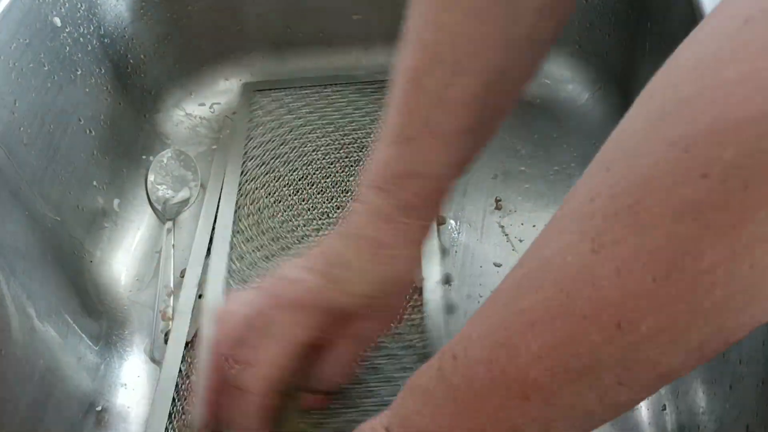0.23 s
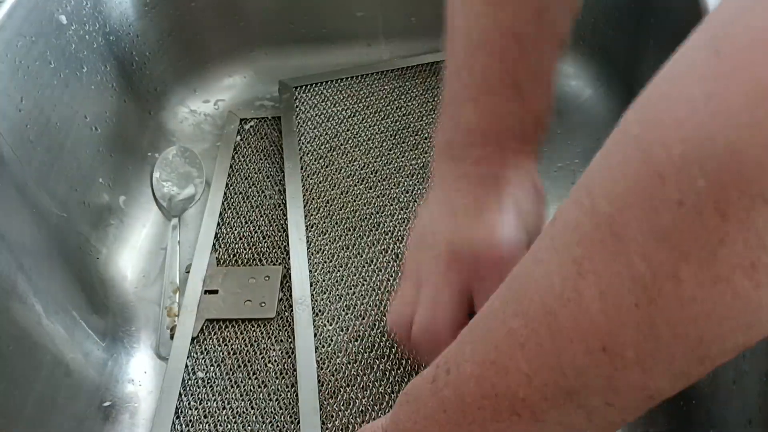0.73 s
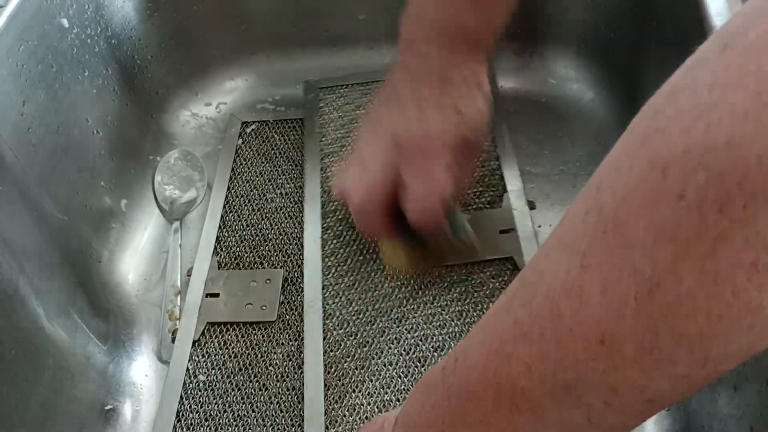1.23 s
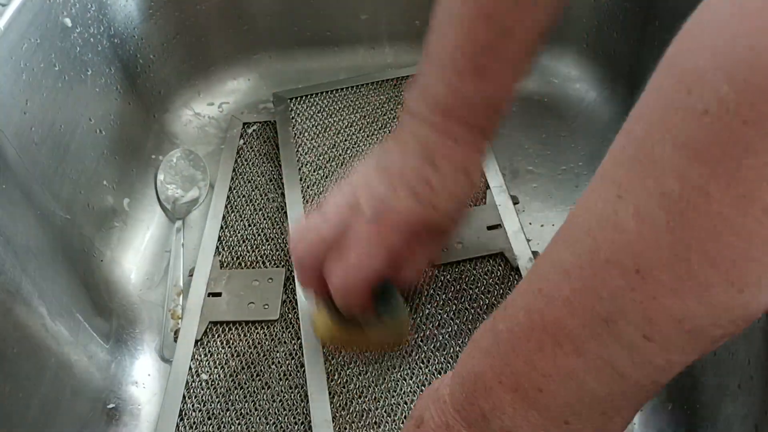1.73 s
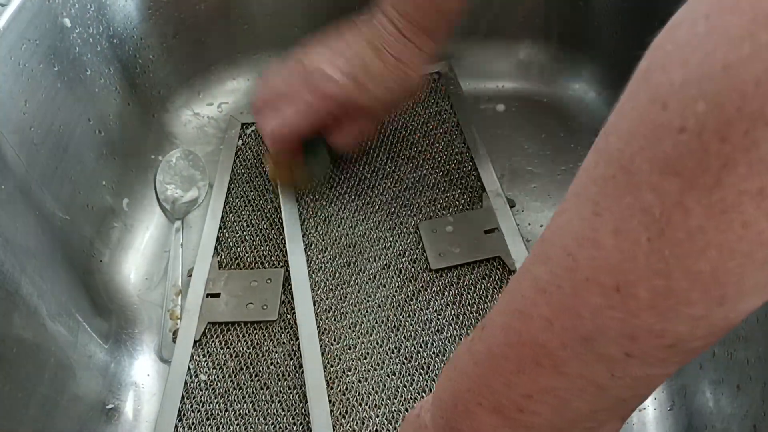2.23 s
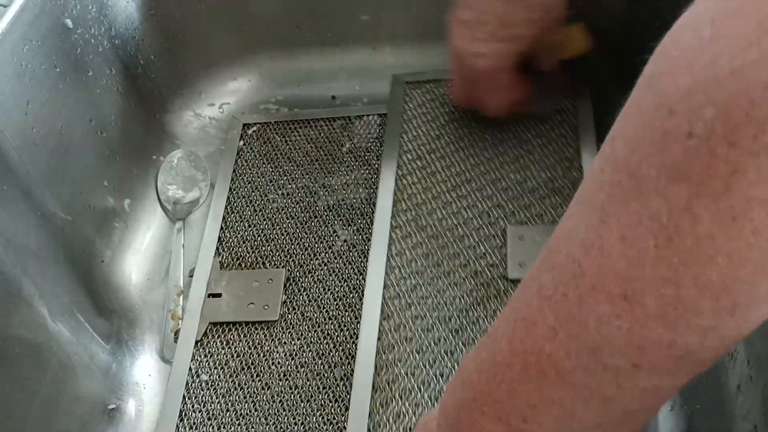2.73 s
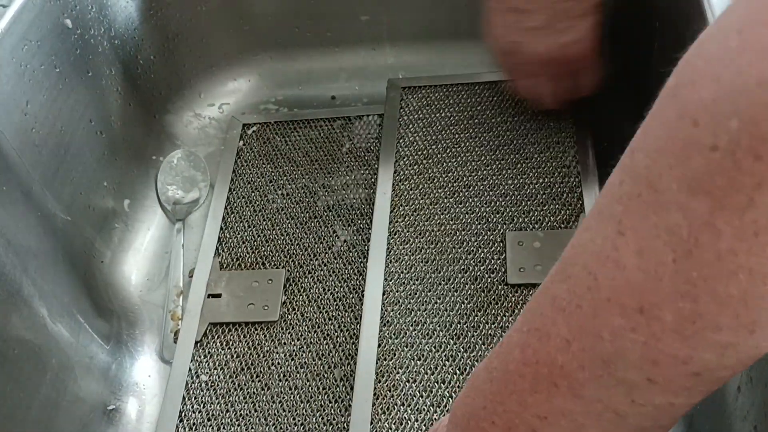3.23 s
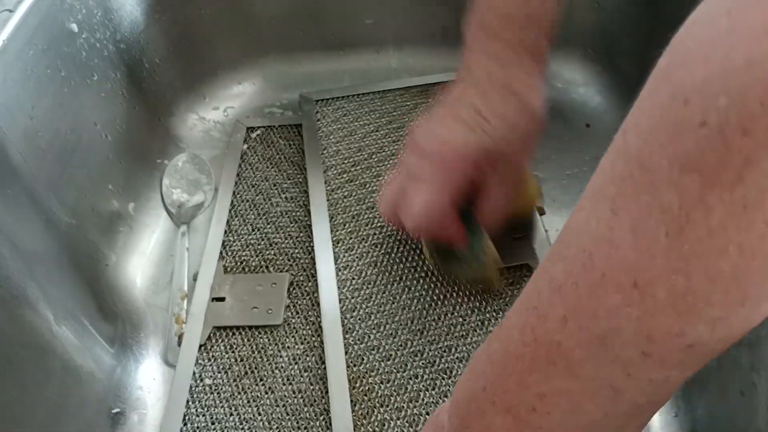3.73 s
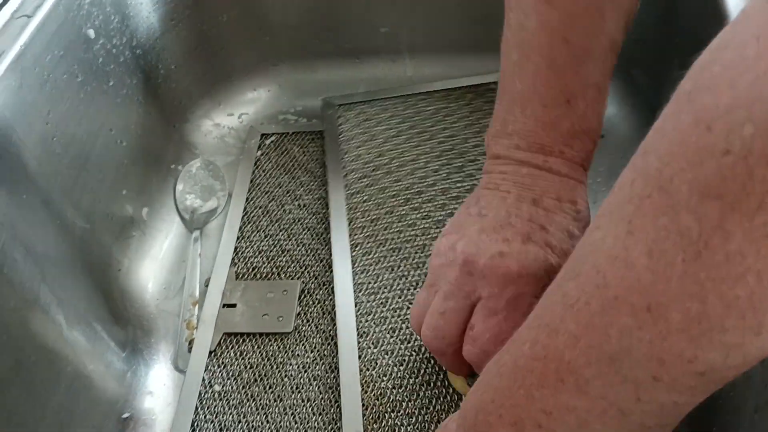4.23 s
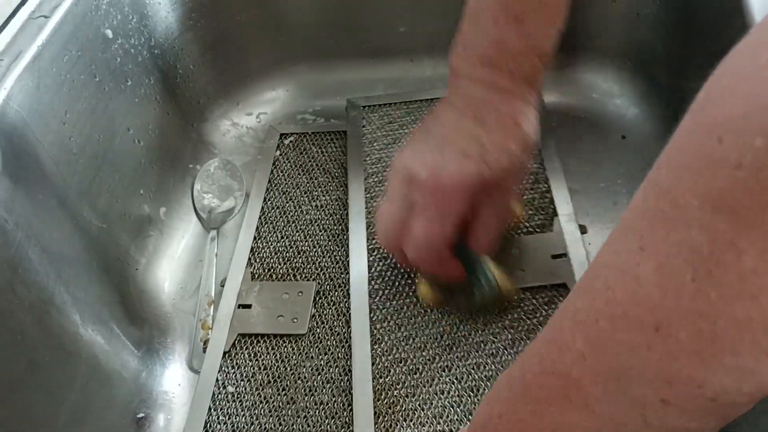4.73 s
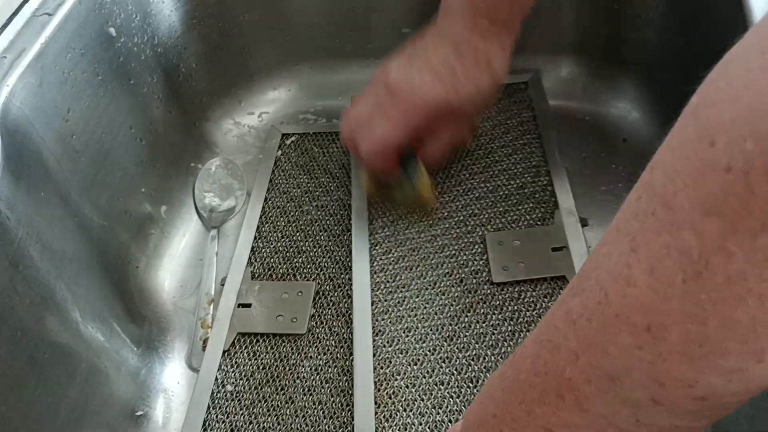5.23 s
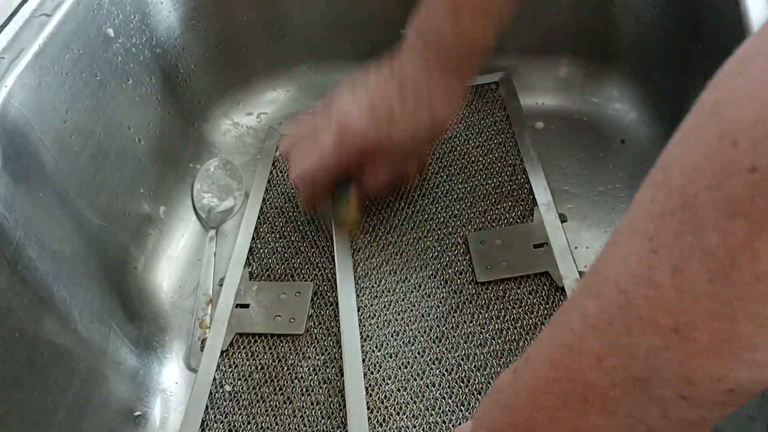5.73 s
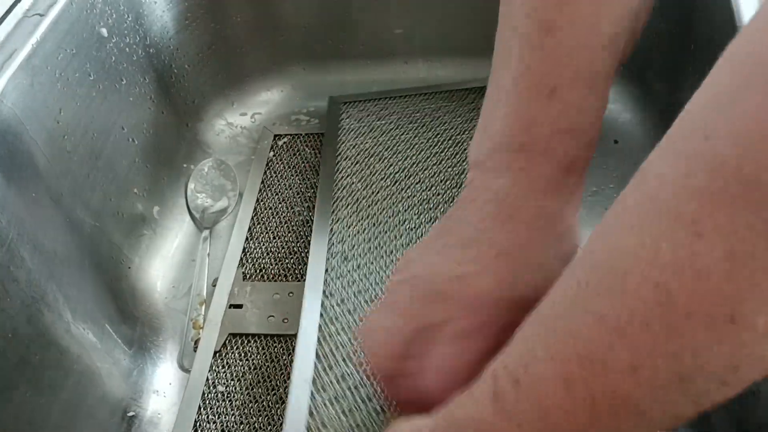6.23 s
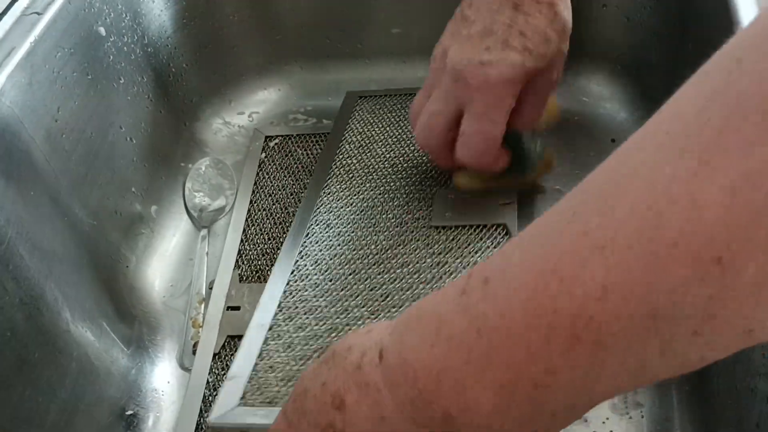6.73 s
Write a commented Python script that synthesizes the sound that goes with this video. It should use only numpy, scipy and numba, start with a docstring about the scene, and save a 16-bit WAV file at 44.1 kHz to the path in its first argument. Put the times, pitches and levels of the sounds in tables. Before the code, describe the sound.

In a quiet kitchen, a wet scouring sponge scrubs a loose metal mesh filter in a steel sink, close and slightly left in stereo. It opens mid-stroke with clacks and a hollow basin ring, then a hard knock, low boom and strong rasp near 0.45 s. Another knock and juddering scrape come at 1.0, a loud coarse stroke at 1.2, and softer rubbing until clanks at 2.0 and 2.2. Around 2.5 to 3.6 fast bright scratches come with floor thuds, while a very faint wavering whine swells near 3.2. From 3.9 to 4.6 the strokes are shorter and lighter, with small ringing judders. Knocks cluster at 4.7 to 5.0; tiny squeaks chirp at 5.35. Quieter scrubbing follows, with a light knock at 6.1, a strong clank and judder at 6.5, a thin high squeak at 6.6, and rasping strokes through the end at about 7.

```python
"""In a quiet kitchen, a wet scouring sponge scrubs a metal mesh filter lying in a steel sink, heard close above.
Quick, uneven strokes shape dense plucks into a rasp, a fine scratch and a duller mesh body.
The loose filter knocks (bursts ringing modes) and judders (rough slips ringing its frame); the sponge squeaks.
The sink floor booms in hums and thuds of shaped noise, over faint room air and a wavering whine."""
import sys
import numpy as np
from scipy import signal
from scipy.fft import rfft, irfft
from scipy.io import wavfile
from scipy.ndimage import uniform_filter1d
from numba import njit

SR = 44100
rng = np.random.default_rng(int(sys.argv[2]) if len(sys.argv) > 2 else 0)


def wrap_up_sound(samples):
    """Save the sound to the file named by the first command line argument, as 16-bit audio."""
    columns = np.atleast_2d(samples).T
    # keep every value between -1 and 1, then stretch to whole-number steps
    tamed = np.clip(columns, -1, 1)
    steps = np.round(tamed * 32767).astype(np.int16)
    wavfile.write(sys.argv[1], SR, steps)


N = 308700
TIME = np.arange(N) / SR

# All levels in the tables are relative: the mix gains in the functions come on top.
# Room air spectrum. Each row: frequency in Hz, density in dB per Hz.
KITCHEN_SPECTRUM = [(30, -17), (62, -7), (100, 8.5), (250, -19), (1500, -16), (9000, -33.5)]
# Strokes of the sponge. Each row: time of fastest motion in seconds, spread of the bell in seconds,
# rasp level in dB, fine scratch in dB relative to the rasp, mesh body in dB relative to the rasp.
STROKES = [(-0.01, 0.023, -42, 2, 20.5), (0.077, 0.071, -63.5, -22, 27.5),
           (0.402, 0.035, -44.5, 13.5, -6.5), (0.472, 0.056, -33, -4, 6.5),
           (0.618, 0.027, -58.5, -16, 18.5), (0.796, 0.04, -53.5, 1.5, -4.5), (1.015, 0.02, -39, -4, -6.5),
           (1.175, 0.029, -31.5, 5, -7), (1.34, 0.047, -49.5, -7, -17), (1.414, 0.028, -37, -2.5, -4),
           (1.65, 0.092, -52.5, -8.5, 5.5), (2.159, 0.034, -42, 1, -2), (2.405, 0.029, -51.5, -6.5, -26),
           (2.555, 0.046, -35.5, 13.5, -13.5), (2.633, 0.037, -40, 0.5, 5.5), (2.842, 0.025, -47, -7, 3),
           (3.064, 0.027, -41.5, 6.5, -2.5), (3.275, 0.02, -49, -2, 9.5), (3.4, 0.057, -62.5, 23.5, -11),
           (3.5, 0.026, -40, 9, -5), (3.563, 0.04, -33, 11, 4), (3.646, 0.039, -46, -34, 2),
           (3.963, 0.015, -40, -3, -13), (4.058, 0.018, -50, -7, -0.5), (4.362, 0.0083, -46.5, -2, -10),
           (4.468, 0.022, -53.5, -7, -2), (4.704, 0.035, -55, 5.5, 3.5), (4.912, 0.044, -43, -19, -2.5),
           (5.026, 0.046, -49.5, -2, 11.5), (5.35, 0.08, -58.5, -5.5, 1), (5.548, 0.023, -42, -3.5, -1),
           (5.688, 0.031, -58.5, -17, 0), (5.956, .042, -55, -2, 0), (6.168, 0.019, -52.5, -4, 6),
           (6.266, 0.0071, -51, -8, -6), (6.4, 0.082, -51.5, -9, -3.5), (6.555, 0.035, -52, -3, 14.5),
           (6.678, 0.037, -46, -2, 2.5), (6.794, 0.027, -41, -4, 4.5), (6.99, 0.019, -37.5, 0, -10)]
# Sponge spectra: rasp, fine scratch, mesh body. Each row: frequency in Hz, density in dB per Hz.
RASP_SPECTRUM = [(300, -59.5), (950, -6.5), (1500, 19), (2200, 15.5), (3200, 14), (6400, 11), (9000, -24.5)]
SCRATCH_SPECTRUM = [(2000, 6), (6800, 18.5), (10000, 8), (13500, -4), (15300, 9.5)]
BODY_SPECTRUM = [(130, -30), (550, -3), (1250, -5), (3000, -62.5)]
# Modes of the filter frame. Each row: frequency in Hz, level in dB.
FRAME_MODES = [(1189, -2.5), (1277, 6), (1440, 9.5), (1488, 4), (2030, 3)]
# Knocks of the filter on the sink. Each row: start in seconds, strength in dB, hard tick in dB relative
# to the strength, basin ring likewise, frequency the struck spot favours in Hz, floor boom in dB.
KNOCKS = [(.002, -8, 0, 4.5, 480, -34.5), (.077, -8.5, 1, 8.5, 395, -31), (.363, -18, 8.5, 9.5, 783, -31.5),
          (.452, 2, -5, -6, 395, -33), (1.02, -3.5, -18, -1, 330, -46.5), (1.571, -29, -15, 12, 348, -52),
          (1.969, -22.5, -7.5, -27, 306, -53), (2.032, -3.5, -10.5, -5.5, 930, -39.5),
          (2.174, -8.5, 2, -3.5, 850, -31.5), (2.523, -6, 1.5, -33, 400, -50),
          (3.349, -14, 1, -12, 700, -48), (4.737, -3.5, -2, -1.5, 875, -38.5),
          (4.892, -5, -3.5, -19, 800, -41), (4.988, -7.5, -8, -7.5, 900, -53),
          (5.345, -32, 3, -1, 600, -84), (6.114, -15, -6, -13, 300, -51.5), (6.482, 2, -12, -12, 950, -50)]
# Knock spectra: the clack (also heard in the judders) and the hard tick.
# Each row: frequency in Hz, density in dB per Hz.
CLACK_SPECTRUM = [(60, -6), (160, 4), (900, 4), (1450, 4.5), (4000, 2), (12000, -38)]
TICK_SPECTRUM = [(1000, -15.5), (4500, 0.5), (9500, -13.5), (13500, -31.5), (15500, -18.5)]
# Modes of the steel basin. Each row: frequency in Hz, level in dB.
BASIN_MODES = [(226, 0.5), (306, -1), (366, -2.5), (446, -3), (570, -3.5), (646, -5), (790, 0), (915, -2.5)]
# Pushes of the hand on the sink floor. Each row: time of the peak in seconds, level in dB.
PUSHES = [(.833, -54), (1.602, -40), (1.699, -43), (2.504, -32.5), (2.6, -44.5), (3.127, -60), (3.321, -47),
          (3.519, -35.5), (3.654, -40.5), (4.009, -50), (4.461, -55.5), (5.537, -46.5), (6.665, -44),
          (6.772, -44.5), (6.983, -39)]
# Modes of the sink floor. Each row: frequency in Hz, level in dB.
FLOOR_MODES = [(87, -1.5), (103, 4), (124, 0.5), (180, -12)]
# Squeaks. Each row: middle in seconds, spread of the bell in seconds, pitch in Hz, level in dB.
SQUEAKS = [(0.228, 0.0065, 4450, -51.5), (5.343, 0.0062, 2140, -43.5), (5.362, 0.0067, 2900, -49.5),
           (6.627, 0.0046, 6100, -47.5)]
# Judders of the frame. Each row: middle in seconds, spread of the bell in seconds, level in dB.
JUDDERS = [(0.473, 0.0078, -23.5), (1.017, 0.023, -38.5), (1.15, 0.062, -40.5), (2.04, 0.0089, -42),
           (2.553, 0.017, -34), (3.851, 0.009, -44), (3.966, 0.024, -43.5), (4.372, 0.0084, -41.5),
           (4.455, 0.016, -47), (4.645, 0.0092, -45.5), (4.914, 0.0099, -33.5), (5.002, 0.013, -35.5),
           (6.124, 0.0081, -34), (6.371, 0.049, -46), (6.505, 0.013, -28)]
# Left over right level. Each row: frequency in Hz, difference in dB.
LEFT_BALANCE = [(300, 3), (1000, 8.5), (1600, 7), (2500, 7.5), (6000, 3)]

# each layer's level follows the stroke curve to this power
RASP_POWER, SCRATCH_POWER, BODY_POWER = 0.87, 2.3, 0.61
# sizzle after a stroke: start relative to the top speed and fall, both before those powers
SIZZLE_DB, SIZZLE_DB_PER_S = -21, 176
CREEP_DB = -72  # between strokes the sponge still creeps over the mesh
LOW_CUT_HZ, TOP_HZ = 23.5, 16000


def undb(db):
    """Decibels to gain."""
    return 10 ** (np.asarray(db) / 20)


def unit(x):
    """Scale to rms 1."""
    return x / np.sqrt(np.mean(x ** 2))


def convolve(x, response):
    """Play a sound through a response."""
    return signal.oaconvolve(x, response)[:N]


def gains(points, size):
    """Spread a spectrum in dB over the bins of a transform, on a log frequency axis."""
    hz, db = np.transpose(points)
    return np.interp(np.log(np.fft.rfftfreq(size, 1 / SR) + 1), np.log(hz), db)


def colour(x, points, size=2048):
    """Give a sound a spectrum with a causal filter of unit energy."""
    # folding the cepstrum forward in time makes the filter minimum phase
    cepstrum = irfft(np.log(undb(gains(points, size))))
    response = irfft(np.exp(rfft(2 * cepstrum[:size // 2], size)))
    return convolve(x, response / np.linalg.norm(response))


def ring(x, modes, t60_s):
    """Drive a set of decaying modes of unit total energy."""
    t = TIME[:SR // 2]
    response = sum((-1) ** k * undb(db) * np.sin(2 * np.pi * hz * t) for k, (hz, db) in enumerate(modes))
    response = response * np.exp(-np.log(1000) * t / t60_s)
    return convolve(x, response / np.linalg.norm(response))


def steady(x, seconds):
    """Even out the slow swells of a sound, keeping its grain."""
    size = int(seconds * SR / 2)
    local_power = uniform_filter1d(uniform_filter1d(x ** 2, size), size)
    return x / np.sqrt(np.abs(local_power) + 1e-12)


@njit
def sweep(x, hz, q):
    """State-variable band-pass with a moving centre."""
    y, band, low = np.empty(len(x)), 0., 0.
    for i in range(len(x)):
        g = np.tan(np.pi * hz[i] / SR)
        v = (band + g * (x[i] - low)) / (1 + g * (g + 1 / q))
        band, low, y[i] = 2 * v - band, low + 2 * g * v, v / q
    return y


def plucks(per_second, spread_db):
    """Dense clicks of uneven size: fibres or edges that catch and let go."""
    caught = rng.random(N) < per_second / SR
    sign = np.sign(rng.standard_normal(N))
    return unit(caught * sign * undb(spread_db * rng.standard_normal(N)))


def wander(x):
    """The moving hand damps and frees patches of mesh, so narrow resonances come and go."""
    depth_db, width_bins, hold_frames = 4.5, 2, 11
    bins = signal.stft(x, nperseg=512)[2]
    field = rng.standard_normal(bins.shape)
    for _ in range(2):
        field = uniform_filter1d(field, width_bins, axis=0)
        field = uniform_filter1d(field, hold_frames, axis=1)
    return signal.istft(bins * unit(undb(depth_db * unit(field))))[1][:N]


def kitchen(whine_hz=1647, whine_q=45.0, loudest_s=3.16, swell_s=0.29):
    """Quiet room noise with a faint, wavering whine that swells once."""
    air = np.array([colour(rng.standard_normal(N), KITCHEN_SPECTRUM) for _ in range(2)])
    drift = unit(uniform_filter1d(rng.standard_normal(N), SR // 2))
    centre = whine_hz * (1 + 0.009 * drift)
    narrow = sweep(sweep(rng.standard_normal(N), centre, whine_q), centre, whine_q)
    whine = steady(narrow, 0.064)
    swell = np.exp(-((TIME - loudest_s) / swell_s) ** 2)
    return undb(-63.0) * air + whine * (undb(-69.5) + undb(-62) * swell)


def stroke(s, half_s):
    """One stroke: the hand speeds up and slows down in a bell, then the mesh sizzles out."""
    speed = np.exp(-.5 * ((TIME - s) / half_s) ** 2)
    sizzle = np.where(TIME < s, speed, undb(-SIZZLE_DB_PER_S * np.abs(TIME - s)))
    return np.maximum(speed, undb(SIZZLE_DB) * sizzle)


def scrubbing():
    """Strength of rasp, fine scratch and mesh body: the powers of all strokes add up."""
    power = np.full((3, N), undb(CREEP_DB) ** 2)
    for s, half_s, db, scratch_db, body_db in STROKES:
        near = np.abs(TIME - s) < .5
        speed = stroke(s, half_s)[near]
        layers = np.array([undb(db) * speed ** RASP_POWER,
                           undb(db + scratch_db) * speed ** SCRATCH_POWER,
                           undb(db + body_db) * speed ** BODY_POWER])
        power[:, near] += layers ** 2
    return np.sqrt(power)


def sponge(hump_hz=850, db_per_octave=26, medium_db=-50,
           bright_hz=2300, bright_db_per_octave=22, bright_q=0.41):
    """Fibres rasp over mesh; a louder stroke crosses more wires a second, so rasp and hump glide up."""
    rasping, scratching, pressing = scrubbing()
    above_db = 20 * np.log10(rasping) - medium_db
    crossing_hz = np.clip(hump_hz * 2 ** (above_db / db_per_octave), 400, 1600)
    hump = unit(sweep(sweep(plucks(4000, 4.4), crossing_hz, 0.55), crossing_hz, 0.84))
    fibres = steady(plucks(1800, 5.45), 0.061)
    wire_hz = np.clip(bright_hz * 2 ** (above_db / bright_db_per_octave), 1900, 4000)
    wires = unit(sweep(colour(fibres, RASP_SPECTRUM), wire_hz, bright_q))
    rasp = undb(-2.0) * wires + undb(-6.5) * ring(fibres, FRAME_MODES, t60_s=0.11)
    scratch = undb(-7.0) * colour(fibres, SCRATCH_SPECTRUM)
    body = undb(-10.0) * colour(fibres, BODY_SPECTRUM) + undb(-9.0) * hump
    return wander(rasping * rasp + scratching * scratch + pressing * body)


def knocks(chatter_s=0.0086, spot_q=1.08):
    """A contact and short rattle of loose mesh ring the frame and the basin modes the struck spot favours."""
    blows, ticks, basin = np.zeros((3, N + SR))
    t = TIME[:SR // 10]
    for s, db, tick_db, basin_db, spot_hz, _ in KNOCKS:
        rattle = rng.standard_normal(len(t)) * (rng.random(len(t)) < .15)
        contact = (t == 0) + rattle * np.exp(-t / chatter_s)
        contact = undb(db) * contact / np.linalg.norm(contact)
        span = max(int(s * SR), 0) + np.arange(len(t))
        blows[span] += contact
        ticks[span] += undb(tick_db) * contact
        basin[span] += undb(basin_db) * sweep(contact, np.full(len(t), float(spot_hz)), spot_q)
    clack = undb(2.0) * colour(blows, CLACK_SPECTRUM) + undb(4.0) * colour(ticks, TICK_SPECTRUM)
    frame_ring = undb(-14.0) * ring(blows, FRAME_MODES, t60_s=0.11)
    basin_ring = undb(10.0) * wander(ring(basin, BASIN_MODES, t60_s=0.23))
    return clack + frame_ring + basin_ring


def boom(rise_db_per_s=650, fall_db_per_s=170, tail_db=-19, tail_db_per_s=65):
    """Each knock and push of the hand shakes the thin sink floor: a broad thud, then its low modes hum on."""
    shakes = PUSHES + [(s, db) for s, *_, db in KNOCKS]

    def swell(fall):
        """Rise and fall straight in dB around each shake, adding powers."""
        return np.sqrt(sum(undb(db - np.maximum((s - TIME) * rise_db_per_s, (TIME - s) * fall)) ** 2
                           for s, db in shakes))

    hum = steady(ring(rng.standard_normal(N), FLOOR_MODES, t60_s=0.14), 0.074)
    thud_spectrum = [(90, -34.5), (170, 8.0), (340, 5.5), (600, -49.5)]  # Hz, dB per Hz
    thud = steady(colour(rng.standard_normal(N), thud_spectrum), 0.26)
    hum_level = undb(5.5) * swell(fall_db_per_s) + undb(tail_db) * swell(tail_db_per_s)
    return hum_level * hum + undb(-6.5) * swell(2 * fall_db_per_s) * thud


def squeaks(q=14.0):
    """The wet sponge sticks and slips on the metal for an instant, in a narrow band."""
    slips = plucks(4200, 4.0)
    return sum(undb(db) * stroke(s, half_s) * unit(sweep(slips, np.full(N, float(hz)), q))
               for s, half_s, hz, db in SQUEAKS)


def judders(main_hz=1478.0, q=24.0):
    """The frame sticks and slips on the steel: a scrape rings its modes, most of all a strong bending one."""
    push = sum(undb(db) * np.exp(-.5 * ((TIME - s) / half_s) ** 2) for s, half_s, db in JUDDERS)
    slips = steady(plucks(1200, 2.7), 0.04)
    bending = steady(sweep(slips, np.full(N, main_hz), q), 0.061)
    scrape = undb(-10.5) * colour(slips, CLACK_SPECTRUM)
    frame_ring = undb(2.0) * ring(slips, FRAME_MODES, t60_s=0.13)
    return push * (undb(-0.5) * bending + wander(scrape + frame_ring))


def sink(x, direct_db=-3, t60_s=0.069, room_db=-14, room_t60_s=0.29):
    """Steel walls scatter the short waves differently to each side; the kitchen adds a faint tail."""
    scatter_hz, ripple_bins = 450, 25
    t = TIME[:SR // 2]
    lows = signal.sosfiltfilt(signal.butter(2, scatter_hz, fs=SR, output="sos"), x)
    sides = []
    for _ in range(2):
        near, far = (rng.standard_normal(len(t)) * np.exp(-np.log(1000) * t / t60)
                     for t60 in (t60_s, room_t60_s))
        walls = near / np.linalg.norm(near)
        room = undb(room_db) * far / np.linalg.norm(far)
        paths = rfft(undb(direct_db) * (t == 0) + walls + room)
        # the many paths ripple the spectrum finely without changing its broad colour
        paths = paths / np.sqrt(uniform_filter1d(np.abs(paths) ** 2, ripple_bins))
        sides.append(lows + convolve(x - lows, irfft(paths)[:len(t) // 2]))
    return np.array(sides)


def scene():
    """Two ends of the sponge sound from different places in the sink; all is louder but later on the left."""
    one_end = sink(sponge() + knocks())
    other_end = sink(sponge() + judders() + squeaks())
    left, right = one_end + other_end + boom() + kitchen()
    lag_s = .0007
    delay = np.exp(-2j * np.pi * np.fft.rfftfreq(2 * N, 1 / SR) * lag_s)
    balance = undb(gains(LEFT_BALANCE, 2 * N))
    share = np.sqrt(2 / (1 + balance ** 2))  # keeps the summed power of the sides
    left = irfft(rfft(left, 2 * N) * share * balance * delay)[:N]
    right = irfft(rfft(right, 2 * N) * share)[:N]
    return np.array([left, right])


def record(dry):
    """Thin the deepest bass gently and cut the top steeply."""
    low_cut = signal.butter(2, LOW_CUT_HZ, "highpass", fs=SR, output="sos")
    top_cut = signal.ellip(10, .2, 70, TOP_HZ, fs=SR, output="sos")
    return signal.sosfilt(top_cut, signal.sosfilt(low_cut, dry))


dry = scene()
out = record(dry)
wrap_up_sound(out)
```